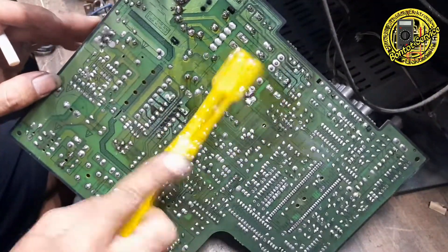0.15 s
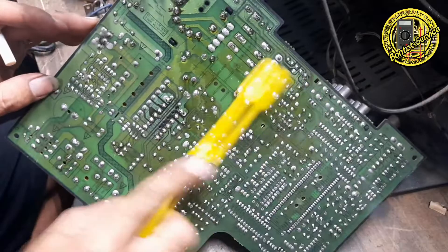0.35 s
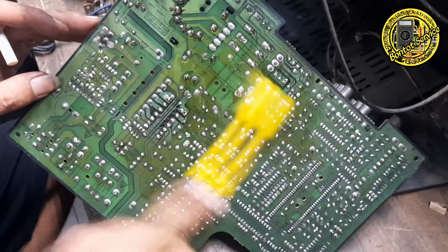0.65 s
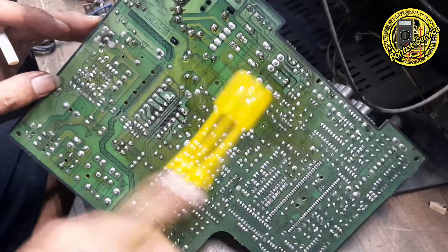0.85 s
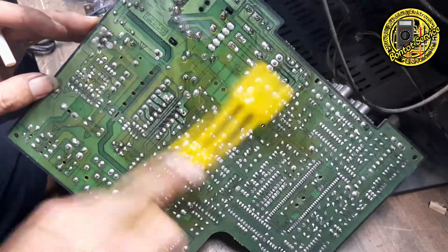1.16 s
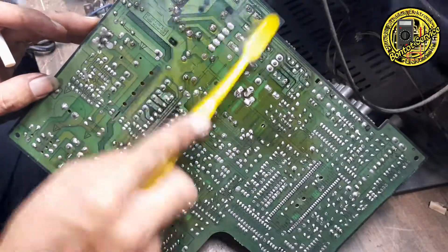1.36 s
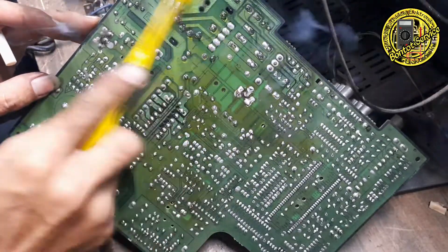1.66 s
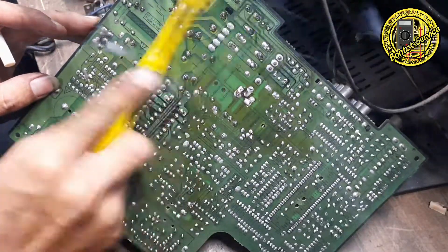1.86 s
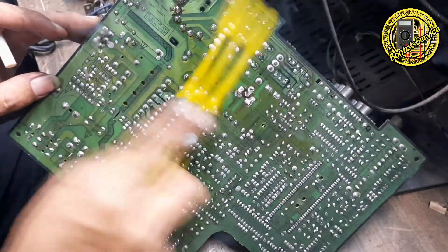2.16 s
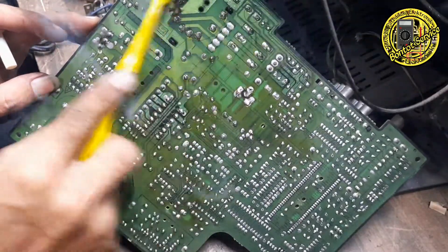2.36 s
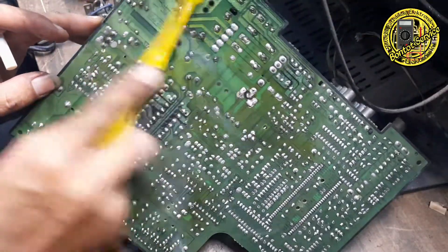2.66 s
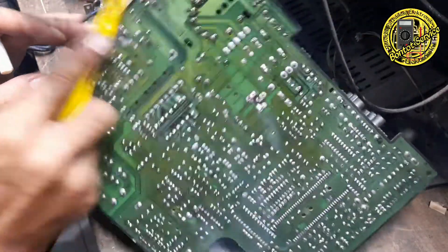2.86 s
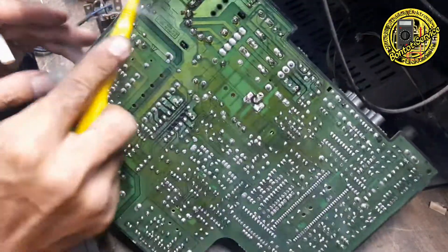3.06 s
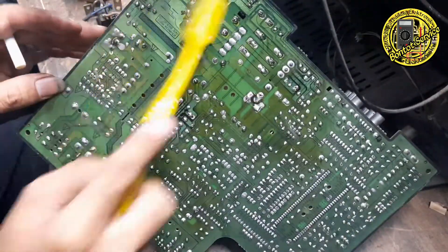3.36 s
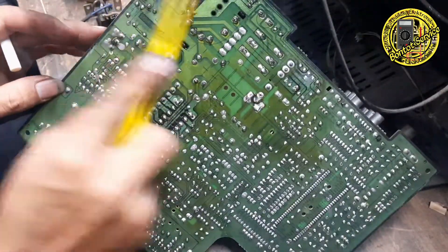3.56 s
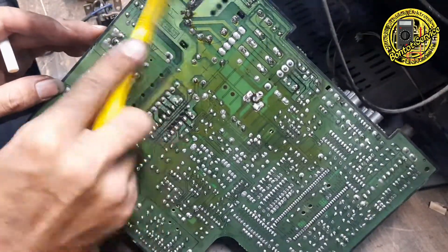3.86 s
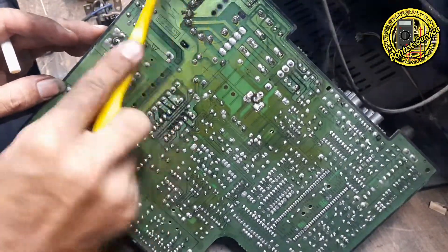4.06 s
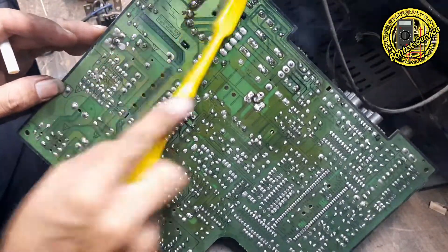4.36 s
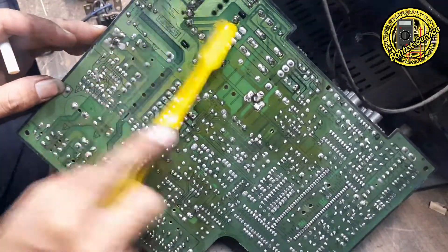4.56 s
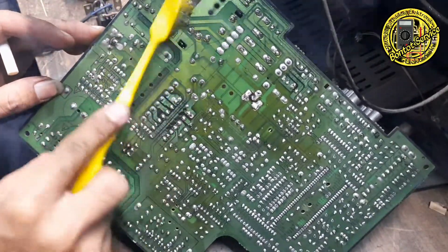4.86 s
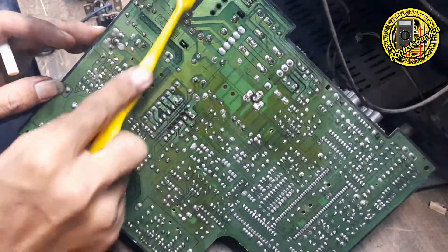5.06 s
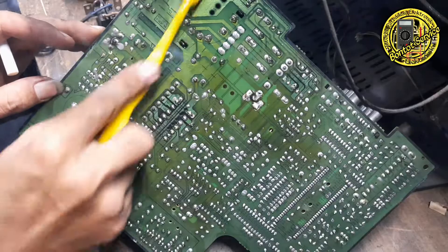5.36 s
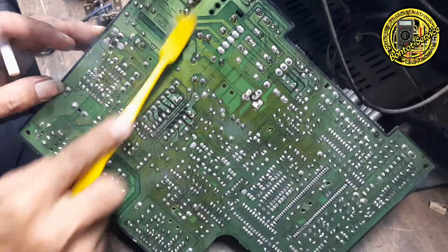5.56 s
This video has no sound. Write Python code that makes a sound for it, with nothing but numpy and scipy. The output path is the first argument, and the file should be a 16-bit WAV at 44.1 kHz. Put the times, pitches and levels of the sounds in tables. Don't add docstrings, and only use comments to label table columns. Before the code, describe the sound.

In a small, dry room, dry-sounding bristles rasp briskly back and forth across a thin, spiky board, recorded close in stereo. The board rocks with dull woody knocks and bench rumble, strongest in the first second. The strokes soften, then a sudden double clatter and bounce ends them. A short quiet gap with faint high hiss follows; gentler scrubbing returns with occasional taps and continues to the end.

```python
import sys
import numpy as np
from scipy import signal
from scipy.fft import rfft, irfft
from scipy.io import wavfile
from scipy.ndimage import uniform_filter1d

SR = 44100
rng = np.random.default_rng(int(sys.argv[2]) if len(sys.argv) > 2 else 0)


def master(y):
    cut = np.clip(np.atleast_2d(y).T, -1, 1)
    pcm = np.round(cut * 32767)
    wavfile.write(sys.argv[1], SR, pcm.astype(np.int16))


def nominal_scale(level):
    x = np.asarray(level, float) / 20
    return 10 ** x


N = 252252
T = np.arange(N) / SR
QUARTER_TURN = np.array([[0], [np.pi / 2]])


def evened(x):
    return x / np.sqrt(np.mean(x ** 2) + 1e-20)


def steadied(x):
    power = uniform_filter1d(uniform_filter1d(x ** 2, size=2000), size=2000)
    return x / np.sqrt(power + 1e-12) ** 0.76


def read(points, hz):
    f, value = np.transpose(points)
    return np.interp(np.log(hz + 1), np.log(f + 1), value)


def curve(rows, column):
    rows = np.array(rows)
    return np.interp(T, rows[:, 0], rows[:, column])


def add(mix, s, sound):
    part = mix[..., max(round(s * SR), 0):][..., :sound.shape[-1]]
    part += sound[..., :part.shape[-1]]


def colour(x, points):
    gain = nominal_scale(read(points, np.fft.rfftfreq(N, 1 / SR)))
    return evened(irfft(rfft(x) * gain, N))


def ring(x, modes):
    return sum(nominal_scale(db) * signal.lfilter(*signal.iirpeak(hz, hz / width, SR), x) for hz, width, db in modes)


def flutter(hz):
    lowpass = 1 / (1 + (np.fft.rfftfreq(N, 1 / SR) / hz) ** 4)
    return evened(irfft(rfft(rng.standard_normal(N)) * lowpass, N))


# pitch_hz, density_db (per Hz)
ROOM_MURMUR = [(24, -41), (40, 6), (106, 9.5), (130, -16.5), (252, -12), (288, 7), (321, -49), (367, -8),
               (535, -62), (8000, -78), (10400, -93), (17600, -120)]
# pitch_hz, density_db (per Hz)
HIGH_HISS = [(7000, -25), (8900, -18), (9700, -8), (10700, -5), (11500, -22), (12200, -37), (14500, -29),
             (15300, -47)]


def air():
    low, high = rng.standard_normal((2, 2, N))
    return nominal_scale(-53) * colour(low, ROOM_MURMUR) + nominal_scale(-63.5) * colour(high, HIGH_HISS)


# start_s, resting_bristles_db, weight_on_board_db
HAND_WEIGHT = [(0.0, -38.5, -54.5), (.38, -50, -55), (.97, -49, -46), (1.25, -42, -75), (1.45, -52, -57.5),
               (1.7, -52, -51.5), (2.13, -47.5, -51), (2.37, -70, -53), (2.7, -42.5, -77),
               (2.91, -59, -48.5), (3.25, -77, -59), (3.44, -71.5, -73.5), (3.62, -53, -53),
               (4.19, -46, -60.5), (4.7, -48.5, -53), (4.99, -58, -57.5), (5.4, -74, -56.5),
               (5.72, -51, -53)]
# peak_s, level_db
ARM_SHOVES = [(.09, -46), (.22, -35.5), (.3, -38), (.45, -33.5), (.56, -36), (.68, -27.5), (.78, -45),
              (.87, -29.5), (1.0, -55), (1.11, -32.5), (1.2, -38.5), (1.33, -43.5), (1.492, -36.5),
              (1.6, -40.5), (1.7, -40), (1.81, -36.5), (1.95, -38), (2.05, -43), (2.15, -37.5),
              (2.272, -35.5), (2.629, -41), (2.749, -31.5), (2.86, -23.5), (2.92, -32.5), (3.04, -47),
              (3.63, -46.5), (3.72, -43), (3.79, -48), (3.95, -47), (4.08, -35), (4.18, -41), (4.31, -33),
              (4.45, -57), (4.6, -44), (4.69, -36), (4.8, -44), (4.9, -55), (5.05, -52), (5.25, -45),
              (5.38, -43), (5.46, -49), (5.55, -52), (5.72, -44)]


def shoves():
    rise_db_per_s, fall_db_per_s = 284, 211.5
    bed_db = -49.5 + 0.71 * (curve(HAND_WEIGHT, column=2) + 55)
    power = nominal_scale(2 * bed_db)
    for s, db in ARM_SHOVES:
        drop_db = np.maximum(rise_db_per_s * (s - T), fall_db_per_s * (T - s))
        power += nominal_scale(2 * (db - drop_db))
    return np.sqrt(power)


# pitch_hz, width_hz, level_db
BENCH_MODES = [(53.5, 15, -15), (76, 13, -9), (104.2, 5.2, -1.5), (154.9, 15, -3.5)]
# start_s, level_db
LYING_FLAT = [(0, -3), (.6, -0.5), (1.3, -1.5), (2.2, -5.5), (2.9, -1), (3.6, -6), (4.3, -10), (4.75, -4.5),
              (5.2, -9), (5.72, -8.5)]
# pitch_hz, width_hz, level_db
FLEX_MODES = [(241.3, 14.7, 4), (303.4, 7.1, 6.5), (339.6, 20, -2), (420, 13.4, -5.5), (655, 30, -53),
              (733, 30, -37.5)]


def bench(speed):
    shake = rng.standard_normal((2, 2, N))
    tones = []
    for hz, width, db in BENCH_MODES:
        tone = ring(ring(shake[0], [(hz, width, 0)]), [(hz, 60., 0)])
        tones.append(nominal_scale(db) * evened(steadied(tone)))
    deep, low, main, upper = tones
    rumble = evened(deep + low + main + upper * nominal_scale(curve(LYING_FLAT, column=1)))
    pulse = (speed / uniform_filter1d(speed, size=9000)) ** 0.26
    flex = evened(ring(ring(shake[1], FLEX_MODES), [(300, 570.0, 0)]))
    flex_db = curve(HAND_WEIGHT, column=2) + 3.0 * flutter(29.0)
    return shoves() * rumble + nominal_scale(flex_db) * flex * pulse


# start_s, peak_db, pitch_hz, t60_s
MODE_BOUNCES = [(.452, -21, 256.5, 0.15), (.476, -17, 400, 0.028), (.676, -13.5, 281, 0.038),
                (.877, -22, 280, 0.062), (1.994, -32.5, 336, 0.048), (2.701, -28, 1010, 0.031),
                (2.7137, -18, 1730, 0.024), (2.713, -32, 1060, 0.071), (2.7135, -24, 2150, 0.041),
                (2.716, -28, 2790, 0.097), (2.194, -26, 206, 0.16), (2.727, -23, 151, 0.052),
                (2.746, -23, 130, 0.084), (2.764, -16.5, 136.7, 0.11), (2.781, -35, 1620, .05),
                (2.782, -18.5, 621, 0.12), (2.782, -39, 537, .15), (2.785, -28.5, 1094, 0.081),
                (2.784, -26, 1920, 0.076), (2.8355, -25, 824, .06), (2.837, -31, 1560, 0.052),
                (2.854, -19.5, 157, 0.2), (2.855, -17, 75, 0.21), (2.855, -38, 680, 0.066),
                (2.871, -10.5, 386, 0.044), (2.905, -25, 142, 0.077), (2.922, -38, 528, 0.14),
                (3.038, -50, 1040, 0.044), (3.04, -44, 550, 0.055), (3.082, -45, 510, 0.089),
                (3.099, -34, 323, 0.08), (3.45, -50, 710, 0.086), (1.039, -27.5, 2690, .08),
                (0.463, -23, 1880, 0.086), (.465, -37, 836, .08), (1.575, -39.5, 800, .06),
                (1.575, -38.5, 400, 0.081), (.242, -36, 614, 0.051), (.857, -37, 736, 0.076),
                (1.09, -42, 835, 0.11), (.658, -35, 665, 0.079), (.885, -26, 420, 0.09),
                (0.906, -34, 300, .12), (1.118, -34, 315, 0.21), (4.036, -40, 336, 0.13),
                (4.013, -38, 834, .06), (3.135, -56, 6400, 0.05), (2.801, -19, 293, 0.16),
                (2.839, -22, 300, .08)]


def bounces():
    out, t = np.zeros((2, N)), T[:9000]
    for s, db, hz, t60 in MODE_BOUNCES:
        onset = 1 - np.exp(-t * hz * 1.5)
        add(out, s, nominal_scale(db - 60 * t / t60) * onset * np.sin(2 * np.pi * hz * t + QUARTER_TURN))
    return out


# pitch_hz, width_hz, level_db
BOARD_MODES = [(460, 144, 0.5), (869, 77, 0), (1040, 290, -0.5), (1533, 480, -4), (1770, 76, 2.5),
               (1950, 240, 0), (2650, 700, -8)]
# start_s, peak_db, pitch_hz, rattle_db
EDGE_KNOCKS = [(0.24, -16.5, 279, -15), (.431, -8.5, 291, -20), (.656, -13.5, 283, -17),
               (.854, -10, 291, -19.5), (1.087, -11.5, 297, -17.5), (2.012, -27, 242, -15.5),
               (2.176, -15.5, 299.5, -19.5), (2.701, -35, 374, -23), (2.726, -34, 203, -2),
               (2.7811, -10.5, 420, -11.5), (2.7926, -23.5, 318, -32), (2.836, -11.5, 335, -13.5),
               (2.854, -9, 362, -35), (2.869, -38, 360, -12), (2.903, -26, 356, -8.5),
               (3.037, -34, 300, -11), (3.08, -33, 330, -12), (4.01, -18, 330, -14.5),
               (4.214, -24, 347, -9.5), (4.594, -20.5, 332, -11.5), (5.141, -43, 346, 2.5),
               (5.327, -40, 360, -1.5), (5.361, -30.5, 326, -11), (5.449, -25, 320, -13),
               (5.706, -24, 320, 0)]


def knocks():
    out, t = np.zeros((2, N)), T[:9000]
    swell = (1 - np.exp(-t / 0.0028)) ** 2
    for s, db, hz, rattle_db in EDGE_KNOCKS:
        partials = [  # pitch_hz, level_db, t60_s
            (hz, 0, 0.075),
            (1.136 * hz, 9.5, 0.026),
            (1.63 * hz, -12.0, 0.059),
            (580.0, -14.5, 0.043),
            (887.0, -19.5, 0.034),
            (90.0, -20.0, 0.25)]
        tone = sum(nominal_scale(level_db - 60 * t / t60) * np.sin(2 * np.pi * pitch * t + QUARTER_TURN)
                   for pitch, level_db, t60 in partials)
        thud = evened(ring(rng.standard_normal((2, len(t))), BOARD_MODES[:3]))
        tone += nominal_scale(-8.0 - 60 * t / 0.015) * thud
        rattle = evened(ring(rng.standard_normal((2, len(t))), FLEX_MODES))
        add(out, s + 0.0001, nominal_scale(db - 0.5) * swell * -tone)
        add(out, s + 0.0073, nominal_scale(db + rattle_db - 60 * t / 0.26) * swell * rattle)
    return out


# start_s, peak_db, t60_s, tilt_db (per octave)
TIPPING_CRACKS = [
    (2.702, -22.5, 0.027, -6),
    (2.7136, -17, 0.066, -3),
    (2.7814, -26, 0.038, -20),
    (2.7922, -28.5, 0.03, -10),
    (2.8346, -48, 0.06, -10),
    (2.8547, -33, 0.05, -20),
    (4.1576, -30.5, 0.035, 1.5),
    (2.917, -42.5, 0.03, 1),
    (2.9403, -38.5, 0.071, -15),
    (3.059, -53, 0.031, -14),
]


def ticks():
    out, t = np.zeros((2, N)), T[:4096]
    octaves = np.log2(np.fft.rfftfreq(len(t), 1 / SR) / 10400.0 + 0.57)
    for s, db, t60, tilt_db in TIPPING_CRACKS:
        crack = irfft(rfft(rng.standard_normal((2, len(t)))) * nominal_scale(tilt_db * octaves))
        fade = nominal_scale(db - 12.0 - 60 * t / t60) + nominal_scale(db - 60 * t / 0.032)
        add(out, s, fade * crack)
    return out


# start_s, peak_db, pitch_hz
HEAD_SLAPS = [(.04, -26, 1930), (0.255, -22.5, 1950), (0.371, -25.5, 1950), (0.464, -14, 1885),
              (0.583, -20.5, 2680), (0.687, -25.5, 1930), (0.796, -27, 2330), (.827, -27, 1860),
              (.908, -23.5, 1910), (1.039, -30, 2100), (1.572, -31.5, 1840), (1.686, -30, 1040),
              (1.793, -27, 2650), (1.914, -33, 1800), (1.993, -27.5, 2590), (2.104, -32, 1850),
              (2.212, -22.5, 2390), (3.607, -34.5, 1570), (3.698, -47, 1790), (3.787, -33, 1820),
              (3.879, -36, 1770), (4.064, -31.5, 1770), (4.157, -30.5, 2030), (4.578, -27, 2140),
              (4.654, -33, 950), (4.86, -44, 840), (5.134, -37.5, 1000), (5.33, -36, 820),
              (5.445, -34, 920)]
# start_s, peak_db, pitch_hz
HANDLE_CLATTER = [(2.702, -31, 890), (2.713, -29, 1060), (2.781, -20.5, 1610), (2.836, -30, 830),
                  (2.854, -22, 810), (2.855, -30, 2310), (2.838, -32, 2420), (2.92, -37.5, 1500),
                  (2.921, -36, 820), (3.038, -48, 1720), (3.06, -48, 1590), (3.117, -52, 1810)]
# start_s, peak_db, pitch_hz
JOINT_CATCHES = [(.168, -40, 2040), (0.184, -35, 1840), (.58, -40, 1010), (.69, -29.5, 1450),
                 (0.947, -27, 1950), (1.018, -35, 2050), (1.068, -28.5, 1920), (1.505, -41, 892),
                 (1.634, -38, 1000), (1.881, -38, 910), (2.033, -37, 1770), (2.214, -29, 960),
                 (2.359, -41, 840), (2.482, -36.5, 1770), (2.645, -40, 1750), (3.438, -40, 1820),
                 (3.637, -40, 1770), (3.816, -37, 1830), (3.9, -51, 1770), (4.07, -43, 900),
                 (4.17, -35.5, 780), (3.968, -41, 1000), (4.16, -27, 3020), (4.161, -35, 420),
                 (3.965, -36, 2320), (4.07, -38, 1070), (3.819, -38, 1000), (4.257, -38.5, 1000),
                 (4.363, -35, 800), (4.514, -43, 816), (4.579, -31.5, 930)]


def slaps():
    out, t = np.zeros((2, N)), T[:4000]
    fade = nominal_scale(-60 * t / 0.072) + nominal_scale(-3 - 60 * t / 0.0044)
    for s, db, hz in HEAD_SLAPS + HANDLE_CLATTER + JOINT_CATCHES:
        scratch = rng.standard_normal((2, len(t))) * fade
        scratch[:, 0] += 9.
        patch = [(hz, 260., 0)]
        sound = ring(ring(scratch, patch), patch) + nominal_scale(-14.5) * ring(scratch, BOARD_MODES)
        add(out, s, nominal_scale(db) * sound / abs(sound).max())
    return out


def pins():
    pin = rng.integers(0, 24, N)
    struck = rng.random((2, N)) < 500. / SR
    size = struck * nominal_scale(6.5 * np.minimum(rng.exponential(1, N), 4))
    t, pitches = T[:1500], np.geomspace(2300., 9000., num=24)
    pings = 0
    for k, hz in enumerate(pitches):
        ping = nominal_scale(-60 * t / 0.03) * np.sin(2 * np.pi * hz * t)
        pings = pings + signal.oaconvolve(size * (pin == k), ping[None], axes=1)
    return evened(pings[:, :N])


# start_s, board_share_db, brightness_db (per octave)
BRUSH_PRESSURE = [(0.0, -11.5, 1.5), (.35, -10, 3.5), (.6, -9.5, 2.5), (1.1, -12.5, 2), (1.22, -13.5, 7),
                  (1.46, -8, 4.5), (1.58, -8, 3.5), (1.75, -6.5, 4.5), (1.9, -14.5, 3.5),
                  (2.33, -12.5, 4.5), (2.7, -6.5, 2.5), (3.45, -9, 0.5), (3.65, -4, 2.5), (3.95, -2, 3),
                  (4.3, -8.5, 2.5), (4.8, -12.5, 6), (5.35, -12, 5.5), (5.72, -6.5, 4.5)]


def patchy(x, patch_db=1.5):
    hz, t, z = signal.stft(x, SR, nperseg=256)
    patches = rng.standard_normal((len(t), len(hz))).T
    patches = evened(uniform_filter1d(uniform_filter1d(patches, size=2, axis=0), size=12, axis=1))
    bright_db = np.interp(t, T, curve(BRUSH_PRESSURE, column=2)) - 2.3
    octaves = np.log2(hz[:, None] / 5400.0 + 0.053)
    z *= nominal_scale(patch_db * patches + bright_db * octaves)
    return signal.istft(z, SR, nperseg=256)[1][:, :N]


# start_s, rise_s, hold_s, fall_s, level_db
HARD_STROKES = [(0.034, 0.012, 0.048, 0.022, -26), (0.143, 0.018, 0.039, 0.021, -26.5),
                (0.247, 0.01, 0.048, 0.035, -27.5), (0.359, 0.017, 0.037, 0.028, -25),
                (0.459, 0.0064, 0.062, 0.059, -24.5), (0.574, 0.0069, 0.049, 0.044, -24.5),
                (0.679, 0.0043, 0.068, 0.023, -24.5), (0.79, 0.0047, 0.057, 0.027, -24.5),
                (0.897, 0.0033, 0.062, 0.036, -25.5), (1.003, 0.026, 0.038, 0.027, -26),
                (1.097, 0.019, 0.061, 0.098, -25.5), (1.217, 0.065, 0.026, 0.017, -32.5),
                (1.335, 0.027, 0.049, 0.068, -31), (1.434, 0.081, 0.005, 0.034, -30),
                (1.562, 0.0085, 0.069, .03, -30), (1.672, 0.014, 0.046, 0.022, -33),
                (1.786, 0.0034, 0.023, 0.077, -28), (1.856, 0.057, 0.025, 0.031, -29.5),
                (1.99, 0.0033, 0.058, 0.039, -29.5), (2.084, 0.045, 0.012, 0.038, -25),
                (2.205, 0.006, 0.091, 0.027, -30.5), (2.314, 0.05, 0.015, .03, -34.5),
                (2.419, 0.016, 0.065, 0.025, -30.5), (2.514, 0.036, 0.031, 0.033, -33),
                (2.629, 0.014, 0.059, 0.028, -28.5)]
# start_s, rise_s, hold_s, fall_s, level_db
LIGHT_STROKES = [(3.392, 0.039, 0.034, 0.11, -35.5), (3.497, 0.022, 0.043, .03, -37),
                 (3.59, 0.019, 0.039, 0.056, -34), (3.678, 0.024, 0.04, 0.022, -35),
                 (3.769, 0.017, 0.039, 0.021, -30.5), (3.868, 0.0082, 0.039, 0.033, -32.5),
                 (3.958, 0.0083, 0.046, .04, -30.5), (4.052, 0.017, 0.034, 0.023, -30),
                 (4.147, 0.01, 0.057, .035, -31), (4.245, 0.012, 0.049, 0.026, -32.5),
                 (4.325, 0.041, 0.041, 0.02, -30.5), (4.437, 0.029, 0.024, 0.046, -33),
                 (4.54, 0.0052, 0.056, 0.035, -33), (4.634, 0.018, 0.049, 0.028, -31.5),
                 (4.738, 0.012, 0.041, 0.096, -33), (4.89, 0.052, 0.059, 0.083, -39.5),
                 (5.056, 0.066, 0.045, 0.058, -34), (5.18, 0.064, 0.067, 0.077, -36.5),
                 (5.352, 0.075, 0.039, 0.088, -31), (5.503, 0.049, 0.057, 0.089, -31.5),
                 (5.675, 0.022, 0.05, .03, -34.5)]


def stroke():
    power = nominal_scale(2 * curve(HAND_WEIGHT, column=1))
    rows = np.array(HARD_STROKES + LIGHT_STROKES)
    quick_s, slow_s = 0.11, 0.21
    rise_db, fall_db = 26, 38.5
    period = np.clip(np.diff(rows[:, 0], prepend=rows[0, 0]), quick_s, slow_s)
    for (s, rise, hold, fall, db), slow in zip(rows, period - quick_s):
        sag_db = 1.5 + 48 * slow
        knots = s + np.cumsum([0, rise, hold, fall])
        levels = db - np.array([rise_db, 0, sag_db, fall_db])
        power += nominal_scale(2 * np.interp(T, knots, levels, -200, -200))
    return np.sqrt(power) * nominal_scale(1.57 * flutter(94.0))


# start_s, peak_db
TUFT_FLICKS = [(.04, -47), (.087, -28), (0.193, -20), (0.615, -15.5), (0.902, -23), (0.943, -18),
               (1.0325, -23), (1.14, -16), (1.283, -40), (1.396, -24), (1.627, -30), (1.507, -31),
               (1.5703, -30), (1.7285, -20.5), (1.9155, -27), (2.119, -25), (1.8854, -22), (2.102, -21),
               (2.342, -30.5), (2.3708, -20.5), (2.46, -24), (2.69, -20), (3.394, -32), (3.697, -23),
               (3.878, -27), (4.065, -21.5), (4.284, -15), (4.381, -33), (4.445, -26), (4.467, -20),
               (4.5467, -34), (4.567, -18), (4.6504, -26), (4.806, -24), (4.676, -16), (5.428, -24),
               (5.549, -44)]
# pitch_hz, density_db (per Hz)
BRISTLE_HISS = [(1470, -69), (2500, -11.5), (2640, -3.5), (2850, -33), (3010, -6), (3700, -5.5),
                (4410, -3.5), (5270, -1), (7650, 1.5), (9360, -2.5), (13700, 4.5), (15000, 1.5),
                (16000, -10)]


def bristles(strokes):
    snaps = rng.standard_normal((2, N)) * nominal_scale(2.3 * np.minimum(rng.exponential(1, N), 4))
    speed = strokes.copy()
    t = T[:4000]
    for s, db in TUFT_FLICKS:
        add(speed, s, nominal_scale(db - 3.5 - 60 * t / 0.033) * np.minimum(t / 0.0018, 1))
    board = evened(sum(nominal_scale(1.86 * flutter(4.3)) * ring(snaps, [mode]) for mode in BOARD_MODES))
    board *= nominal_scale(curve(BRUSH_PRESSURE, column=1) - 10.0)
    hiss = evened(patchy(colour(snaps, BRISTLE_HISS)))
    sharp = colour(snaps * (rng.random(N) < 900. / SR), BRISTLE_HISS)
    airborne = nominal_scale(-3.5) * hiss + nominal_scale(-19.0) * sharp + nominal_scale(-18.5) * pins()
    return speed * airborne + (0.78 * strokes + .2 * speed) * board


# pitch_hz, t60_s
WALL_DECAY = [(200, 0.19), (1000, 0.22), (4000, 0.12), (12000, 0.013)]


def walls(x):
    hz, t, z = signal.stft(rng.standard_normal((2, SR // 2)), SR, nperseg=256)
    fade = nominal_scale(-60 * t / read(WALL_DECAY, hz)[:, None])
    tail = signal.istft(z * fade, SR, nperseg=256)[1]
    return signal.fftconvolve(x, tail / np.linalg.norm(tail[0]), axes=1)[:, :N]


# pitch_hz, likeness (0-1)
EAR_LIKENESS = [(100, 0.99), (300, 0.96), (640, 0.5), (1400, 0.37), (2200, 0.61), (4000, 0.48),
                (9000, 0.65), (15000, 0.064)]


def ears(pair, lag=4.48, swing=2.72):
    hz, t, (a, b) = signal.stft(pair, SR, nperseg=256)
    same = np.clip(read(EAR_LIKENESS, hz), 0, 1)[:, None]
    delay = lag + swing * np.interp(t, T, flutter(5.7))
    late = np.exp(-2j * np.pi * hz[:, None] * delay / SR)
    right = same * late * a + np.sqrt(1 - same ** 2) * b
    return signal.istft([a, right], SR, nperseg=256)[1][:, :N]


def scene():
    speed = stroke()
    near = bristles(speed) + slaps() + ticks()
    return ears(near + nominal_scale(-11.5) * walls(near) + knocks() + bounces() + bench(speed) + air())


def roll_off(x):
    return signal.sosfilt(signal.butter(12, 15950, fs=SR, output="sos"), x)


def record(dry):
    edge = signal.firwin(511, 15750, window=("kaiser", 9), fs=SR)
    heard = signal.sosfilt(signal.butter(2, 55., "highpass", fs=SR, output="sos"), dry)
    mix = signal.oaconvolve(heard, edge[None], "same")
    return roll_off(mix)


dry = scene()
out = record(dry)
master(out)
```